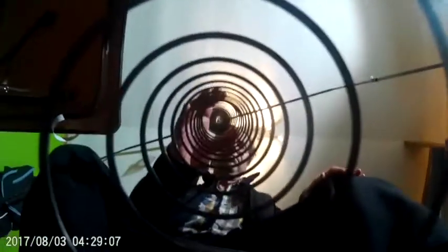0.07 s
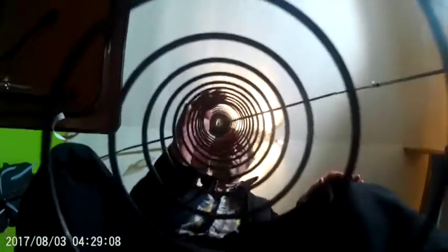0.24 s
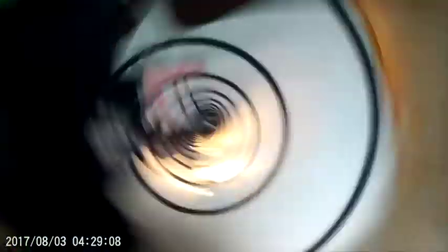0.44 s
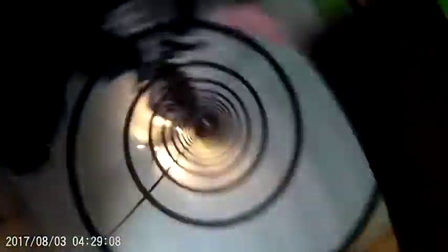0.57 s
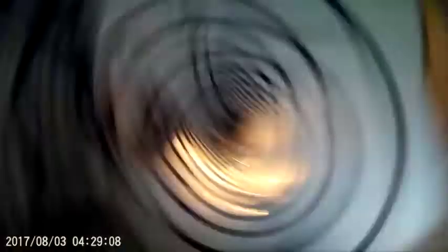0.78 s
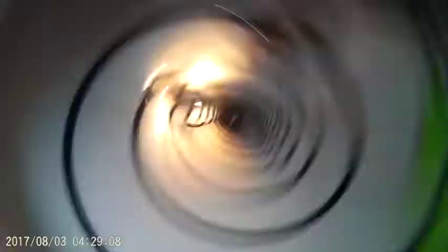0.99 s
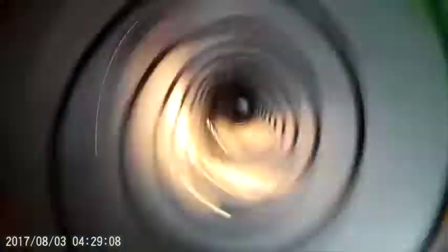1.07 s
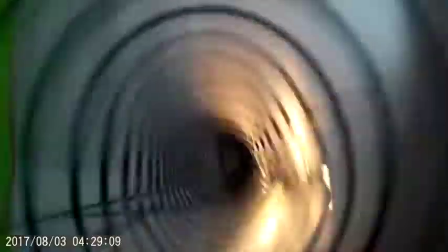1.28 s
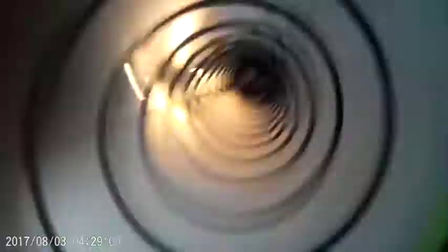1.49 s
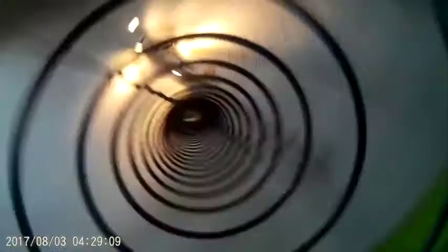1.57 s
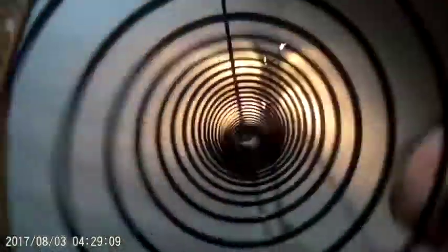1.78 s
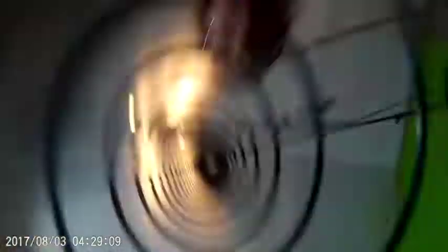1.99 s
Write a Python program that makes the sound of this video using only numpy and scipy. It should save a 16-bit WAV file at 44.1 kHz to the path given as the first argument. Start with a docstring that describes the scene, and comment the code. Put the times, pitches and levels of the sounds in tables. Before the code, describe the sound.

A dangling metal spring toy ticks faintly, hits the camera with one sharp knock, and keeps clattering. Each clash of its coils gives a falling twang over a ringing wash, heard very close indoors and softer toward the end.

```python
"""Faint ticks over a quiet room, then a sharp knock and a run of falling, ringing chirps.
A long steel coil spring hangs from a small camera and is swung about; it knocks on the case and its
turns clash. Bending waves carry treble faster than bass, so each clash arrives as a falling chirp,
chatters, comes back slower from the far end and blurs into a ringing wash."""
import sys
import numpy as np
from scipy import signal
from scipy.fft import rfft, irfft
from scipy.io import wavfile

SR = 44100
rng = np.random.default_rng(int(sys.argv[2]) if len(sys.argv) > 2 else 0)


def bounce(signal):
    """Save signal as a 16-bit WAV file at the path given by the first command-line argument."""
    frames = np.transpose(np.atleast_2d(signal))
    limited = np.clip(frames, -1, 1)
    pcm = np.round(limited * 32767).astype(np.int16)
    wavfile.write(sys.argv[1], SR, pcm)


N = 90404
FFT_SIZE = 65536
HZ = np.fft.rfftfreq(FFT_SIZE, 1 / SR)


def amp(db):
    """Decibels to gain."""
    return 10 ** (np.asarray(db) / 20)


def curve(points, hz):
    """Interpolate (freq_hz, value) points on a log-frequency axis."""
    freq_hz, value = np.transpose(points)
    return np.interp(np.log(hz + 1), np.log(freq_hz + 1), value)


def add(mix, start_s, sound):
    """Mix a sound in at start_s."""
    part = mix[max(round(start_s * SR), 0):][:len(sound)]
    part += sound[:len(part)]


def noise(gain):
    """Noise with spectrum gain(hz), rms 1."""
    x = irfft(rfft(rng.standard_normal(N)) * gain(np.fft.rfftfreq(N, 1 / SR)), N)
    return x / x.std()


def grains(rate_per_s, spread_db):
    """Random clicks of uneven size, rms 1."""
    size = amp(spread_db * np.minimum(rng.exponential(1, FFT_SIZE), 4))
    sign = rng.choice([-1., 1.], FFT_SIZE)
    x = size * sign * (rng.random(FFT_SIZE) < rate_per_s / SR)
    return x / (x.std() + 1e-9)


def burst(rate_per_s, decay_s):
    """Spectrum of a dying click cluster of energy 1."""
    x = grains(rate_per_s, spread_db=2.16) * np.exp(-np.arange(FFT_SIZE) / SR / decay_s)
    return rfft(x / (np.linalg.norm(x) + 1e-9))


def minimum_phase(gain_db):
    """Causal impulse response with gain_db on HZ."""
    log_gain = np.log(amp(np.r_[gain_db, gain_db[-2:0:-1]]))
    spectrum = np.exp(np.conj(signal.hilbert(log_gain)))
    return np.fft.ifft(spectrum).real[:FFT_SIZE // 8]


def dispersion(travel_s):
    """Bending waves in wire: delay is travel_s near 1 kHz and falls with the root of frequency."""
    knee_hz = 170.7  # slowing levels off below this
    return np.exp(-4j * np.pi * travel_s * np.sqrt(1000 * (HZ + knee_hz)))


def background():
    """Quiet room and a thin electrical whine."""
    # room noise spectrum: freq_hz, gain_db
    floor = [(15, -33), (25, -33), (224, -4.5), (394, -10), (1310, -24), (1580, -21), (6370, -33),
             (6900, -30.5), (15000, -33)]
    room_db, whine_db, whine_hz = -64, -76.5, 6850
    whine = amp(whine_db) * np.sqrt(2) * np.sin(2 * np.pi * whine_hz * np.arange(N) / SR)
    return amp(room_db) * noise(lambda f: amp(curve(floor, f))) + whine


def knocks():
    """Coil hits the case: a crack through a short piece of wire, plus the thud of the case modes."""
    # hits: start_s, level_db, crack_hz, width_hz, thud_re_crack_db
    hits = [(.142, -45, 4330, 600, 4), (.166, -39.5, 4140, 605, 0), (.177, -43, 4200, 600, -2),
            (0.3141, 6.5, 4370, 880, -3), (1.1583, -12.5, 720, 1175, -13), (1.3672, -12, 923, 2003, -21)]
    # case modes: pitch_hz, level_db, t60_s
    case_modes = [(178, -2.5, 0.31), (261, -1, 0.35), (325, 0, 0.066), (1326, 25.5, 0.047)]
    out, t = np.zeros(N), np.arange(SR // 2) / SR
    thud = sum(amp(db - 60 * t / t60_s) * np.cos(2 * np.pi * hz * t) for hz, db, t60_s in case_modes)
    for start_s, level_db, crack_hz, width_hz, thud_db in hits:
        ring = minimum_phase(-20 * np.log10(1 + (2 * (HZ - crack_hz) / width_hz) ** 2))
        crack = irfft(rfft(ring, FFT_SIZE) * dispersion(travel_s=0.003))
        add(out, start_s, amp(level_db) * crack / np.linalg.norm(crack))
        add(out, start_s, amp(level_db + thud_db) * thud / np.linalg.norm(thud))
    return out


def handling():
    """Low rumble and soft bumps of the swinging camera."""
    # bumps: centre_s, level_db, sigma_s, pitch_hz
    bumps = [(0.323, -51, 0.026, 211), (.38, -65, 0.02, 49.3), (0.577, -55, 0.021, 56),
             (.91, -55, .045, 180), (1.677, -56, .012, 58.8), (1.756, -51, 0.029, 50.3),
             (1.76, -47.5, .018, 159.5), (2.0, -55, 0.085, 104), (2.04, -54, 0.016, 197.5)]
    rumble_db, corner_hz, start_s, rise_s = -66, 197, 0.16, 0.056
    bump_half_width_hz = 40
    t = np.arange(N) / SR
    fade_in = np.clip((t - start_s) / rise_s, 0, 1)
    out = amp(rumble_db) * noise(lambda f: 1 / (1 + (f / corner_hz) ** 2)) * fade_in
    for centre_s, level_db, sigma_s, pitch_hz in bumps:
        swell = amp(level_db) * np.exp(-0.5 * ((t - centre_s) / sigma_s) ** 2)
        out += swell * noise(lambda f: 1 / (1 + ((f - pitch_hz) / bump_half_width_hz) ** 2))
    return out


def wash_bands():
    """Tiny contacts and repeated reflections: yields each band's rattle and two-stage decay."""
    # wash decay: centre_hz, early_db, early_t60_s, late_db, late_t60_s
    decays = [(270, -32.5, 0.32, 10, 4.1), (602, -4.5, 0.9, 2, 2.23), (1260, 2.5, 0.45, -5, 3.3),
              (2600, -21.5, 0.36, -3, 0.87), (4930, -11.5, 0.72, -17.5, 0.96), (6500, 0.5, 0.55, -2, 0.69),
              (11100, 3, 0.37, -44, 0.47)]
    t, centres_hz = np.arange(FFT_SIZE) / SR, [row[0] for row in decays]
    rattle = rfft(grains(rate_per_s=900, spread_db=3.5))
    for weights, (_, early_db, early_t60_s, late_db, late_t60_s) in zip(np.eye(len(decays)), decays):
        early, late = amp(-120 * t / early_t60_s), amp(-120 * t / late_t60_s)  # power envelopes
        power = amp(early_db) ** 2 * early / early.sum() + amp(late_db) ** 2 * late / late.sum()
        band_gain = curve(list(zip(centres_hz, weights)), HZ)
        yield irfft(rattle * band_gain), np.sqrt(power)


def clash(bands, level_db, travel_s, tilt_db_per_oct, chatter_db, wash_db, mid_db):
    """One contact of turns and its chatter run down the wire, scatter, echo and blur."""
    # colour of the direct wave: freq_hz, gain_db
    twang = [(450, -3), (750, 1.5), (1050, -2), (1500, 4), (2050, -2.5), (3200, -2), (4800, -0.5),
             (7000, -2), (12000, 3)]
    scatter_db = 0.5  # reflections off neighbouring turns
    bounce_db, bounce_trips, wash_trips = -8, 1.35, 1.1  # bounces: rebounds farther down the coil
    echo_db, echo_trips, echo_top_hz = -9.5, 2.9, 5500  # far-end return
    fast_db, fast_lag_s, fast_travel_s, fast_low_hz = -4.5, 0.0063, 0.0064, 6500  # leading treble wave
    mid_hz, mid_sigma_oct, ripple_db, ripple_step_hz = 2300, 0.39, 4.5, 327.3  # contact-point colour

    contact = 1 + amp(chatter_db) * burst(rate_per_s=900, decay_s=0.012)
    scatter = 1 + amp(scatter_db) * burst(rate_per_s=3000, decay_s=0.003)
    scatter /= np.hypot(1, amp(scatter_db))
    shift = rng.integers(FFT_SIZE)
    wash = rfft(sum(np.roll(rattle, shift) * decay for rattle, decay in bands))
    wash *= dispersion(wash_trips * travel_s)
    bounces = amp(bounce_db) * burst(rate_per_s=250, decay_s=0.021) * dispersion(bounce_trips * travel_s)
    direct = amp(curve(twang, HZ)) * dispersion(travel_s)
    echo = amp(echo_db) * dispersion(echo_trips * travel_s) / (1 + (HZ / echo_top_hz) ** 8)
    highpass = 1 - 1 / (1 + (HZ / fast_low_hz) ** 8)
    fast = amp(fast_db) * highpass * dispersion(fast_travel_s) * np.exp(-2j * np.pi * HZ * fast_lag_s)
    waves = contact * (direct + echo + fast) + amp(wash_db) * (wash + bounces)

    octaves = np.log2(np.maximum(HZ, 700) / 3000)
    midrange = np.exp(-0.5 * (np.log2((HZ + 1) / mid_hz) / mid_sigma_oct) ** 2)
    ripple = np.interp(HZ / ripple_step_hz, np.arange(128), rng.standard_normal(128))
    ripple *= HZ / (HZ + mid_hz)
    gain_db = level_db + tilt_db_per_oct * octaves + mid_db * midrange + ripple_db * ripple
    return irfft(amp(gain_db) * scatter * waves)


def coil():
    """All clashes, heard through the resonances of coil and case."""
    # clashes of turns: start_s, level_db, travel_s, tilt_db_per_oct, chatter_db, wash_db, mid_db
    clashes = [ (.215, -25, 0.021, -3, 12, 19.5, 2), (.2345, -3, 0.027, -3, 0.5, -1.5, 1),
               (.275, -5.5, 0.027, -1.5, -0.5, -2, 5), (.2825, 0.5, 0.029, -0.5, -24, 1, 2.5),
               (0.3656, 0, 0.051, 0.5, 0, 2.5, -1), (.381, -4.5, .070, 0.5, -2, 2, 2),
               (.5817, -3.5, 0.058, 3, -3, -3.5, 5), (0.6627, -12.5, 0.062, 2.5, -4.5, -3, 1.5),
               (0.699, -21, 0.069, 0.5, 12, 4, 5.5), (.7135, -17.5, 0.063, 1, -2.5, -1.5, 9.5),
               (0.874, -22.5, 0.057, -5, 3.5, 4, 5.5), (.884, -19, .061, -1.5, 1.5, -1.5, -6.5),
               (.931, -14.5, .060, -1, 5, 9, -4.5), (0.959, -4, 0.065, 0, -2, -2.5, -2),
               (1.018, -13.5, 0.053, 1, 9.5, 3.5, 0.5), (1.0561, 2, .062, -1, -7.5, -9, -1.5),
               (1.1671, -0.5, .061, 1, -16.5, -10, 2), (1.2658, -15, 0.056, -0.5, -1, -7, 1.5),
               (1.280, -15.5, 0.06, 0, -5, -3.5, 0), (1.2935, -36, .063, 7, -7.5, -1, 4),
               (1.3142, -10.5, .059, 0.5, -0.5, 3.5, 1), (1.3445, -13, .062, 0, -6, -10.5, -3),
               (1.3595, -13, 0.057, -4, 3, -3, 4.5), (1.376, -13, 0.058, -2, 0, -1.5, 6.5),
               (1.5018, -8, 0.055, 0.5, 1, -6.5, -1), (1.5177, -12.5, 0.059, -1, 4.5, 4.5, 1.5),
               (1.709, -24, 0.052, -3, 5, 0, -1), (1.7205, -13.5, .061, 1.5, 5.5, -0.5, 8),
               (1.8034, -24, 0.063, 1, -2, 0.5, 1.5), (1.9527, -22, 0.056, -3, -3, -0.5, 1.5),
               (1.974, -26.5, 0.05, -3.5, -2, 1, 2.5), (2.018, -24, 0.064, -0.5, 4.5, 4, -2)]
    # broad colour of coil and case: freq_hz, gain_db
    colour = [(60, -33), (200, -16), (480, -7.5), (620, 0), (950, 0.5), (1250, 9.5), (1650, -8),
              (2200, 5.5), (3200, -3), (4900, -2.5), (6000, -10), (7800, -17.5), (10000, -12.5),
              (13000, -15), (15000, -27), (16000, -58)]
    # resonances on top: centre_hz, width_hz, lift_db
    resonances = [(562.5, 18.5, 12), (692.2, 36, 8.1), (788, 90, 9.34), (1227, 210, 2), (1401.5, 67, 13.44),
                  (1525.6, 54, 10.9), (1776, 58, 11.6), (2036, 136, 13.8), (2340, 17, 3.5), (2410, 18, 1.7),
                  (2937, 140, 8.3), (3550, 220, 9.1), (4450, 120, 3.1), (4553, 220, 11.3), (4800, 270, 7.2),
                  (5190, 290, 9), (5730, 120, 6), (6590, 470, 13.3), (7310, 150, 9.5), (8420, 350, 6.7),
                  (9360, 170, 6.5), (10250, 290, 9.1), (11400, 189, 4.4), (12100, 302, 6),
                  (12600, 120, 5.12)]
    gain_db = 5.5
    wire, bands = np.zeros(N), list(wash_bands())
    for start_s, *settings in clashes:
        add(wire, start_s, clash(bands, *settings))
    peaks_db = sum(db / (1 + (2 * (HZ - hz) / width_hz) ** 2) for hz, width_hz, db in resonances)
    body = minimum_phase(curve(colour, HZ) + peaks_db)
    return amp(gain_db) * signal.fftconvolve(wire, body)[:N]


def scene():
    """Mono sum at the microphone."""
    return (coil() + knocks() + handling() + background())[None]


def record(dry):
    """Low-pass at 15.5 kHz."""
    lowpass = signal.firwin(161, 15500, window=("kaiser", 9), fs=SR)
    return signal.oaconvolve(dry, lowpass[None], "same")


dry = scene()
out = record(dry)
bounce(out)
```